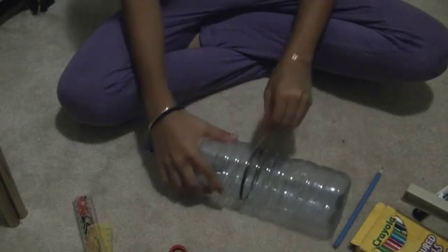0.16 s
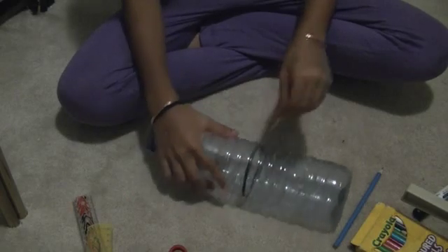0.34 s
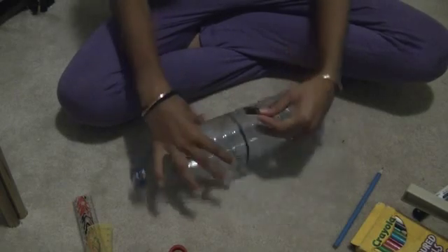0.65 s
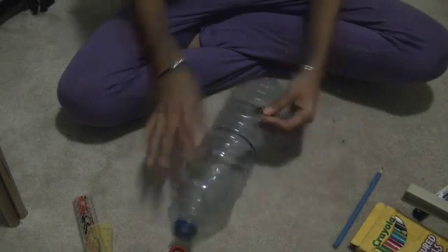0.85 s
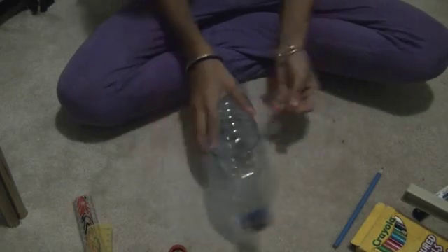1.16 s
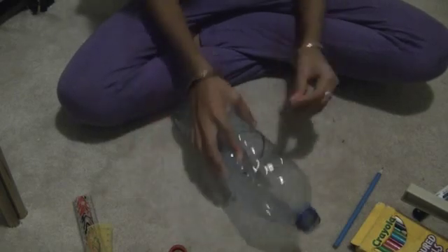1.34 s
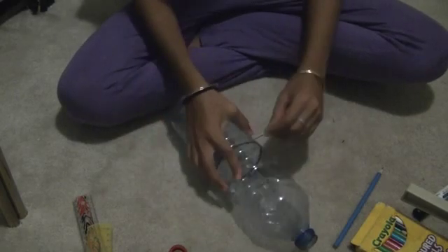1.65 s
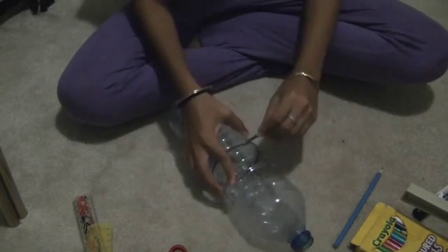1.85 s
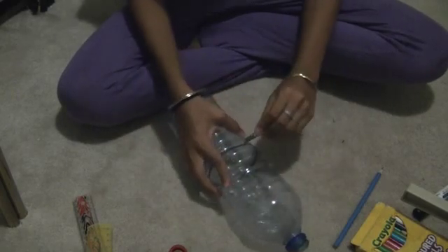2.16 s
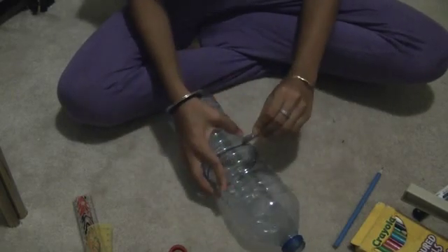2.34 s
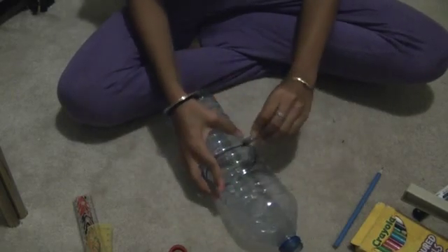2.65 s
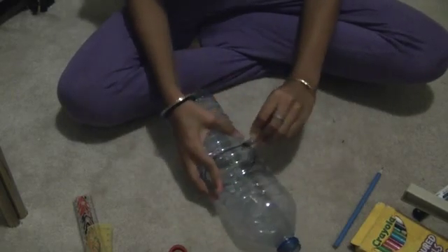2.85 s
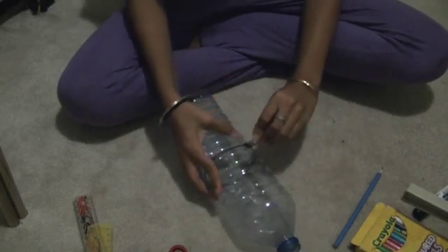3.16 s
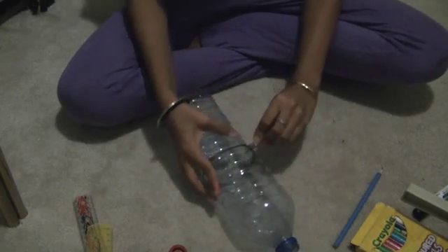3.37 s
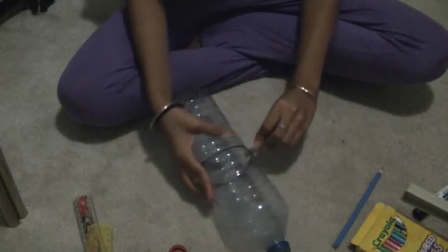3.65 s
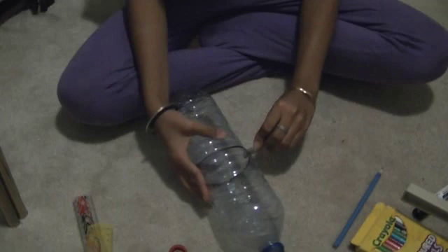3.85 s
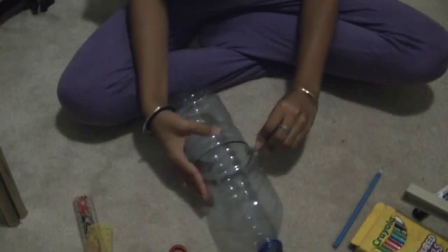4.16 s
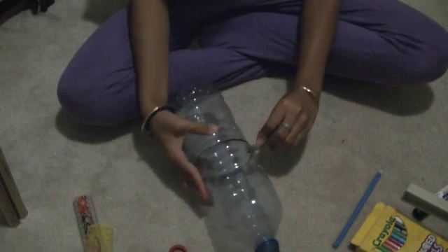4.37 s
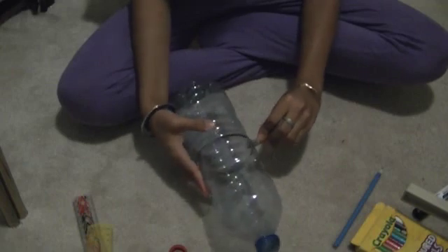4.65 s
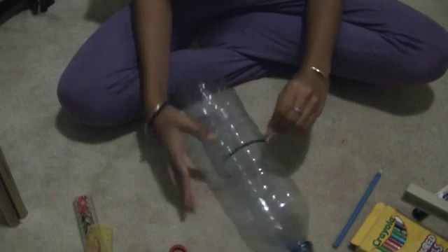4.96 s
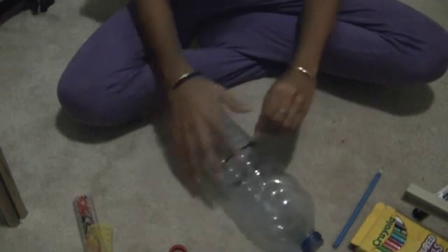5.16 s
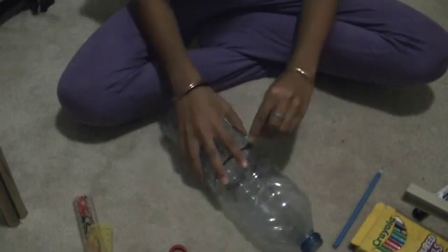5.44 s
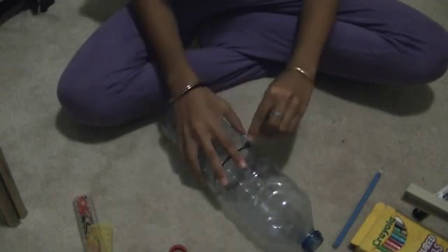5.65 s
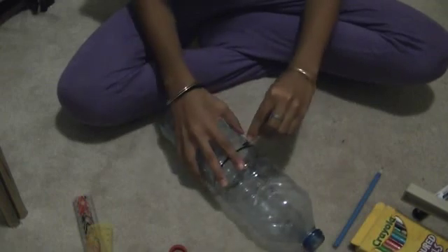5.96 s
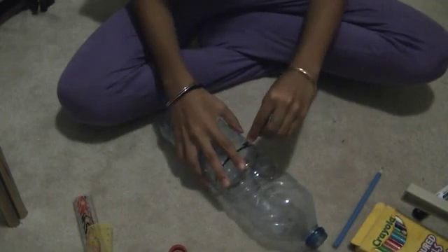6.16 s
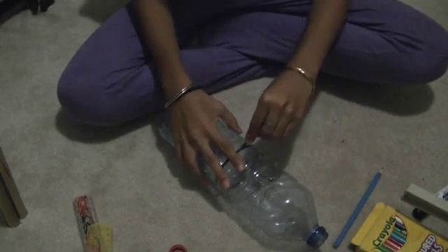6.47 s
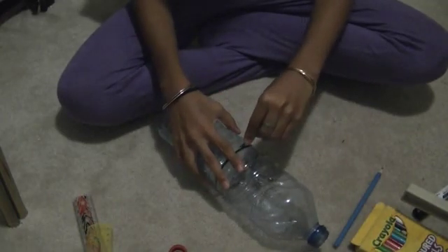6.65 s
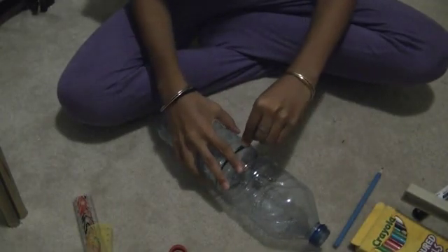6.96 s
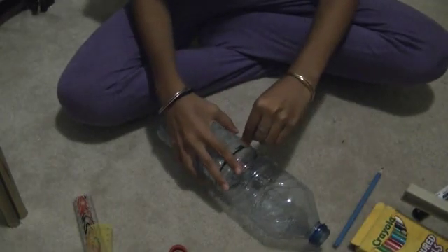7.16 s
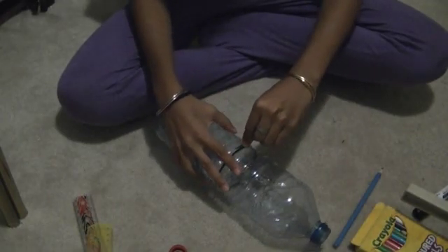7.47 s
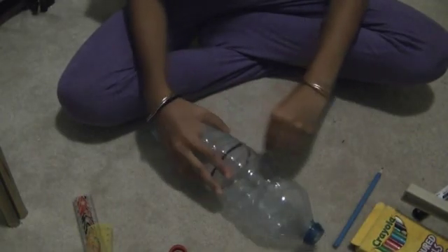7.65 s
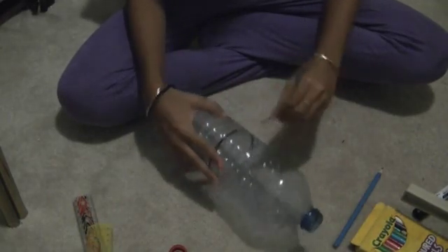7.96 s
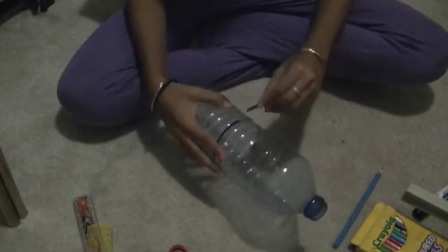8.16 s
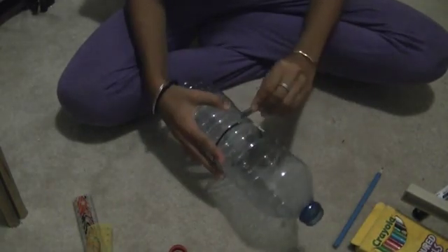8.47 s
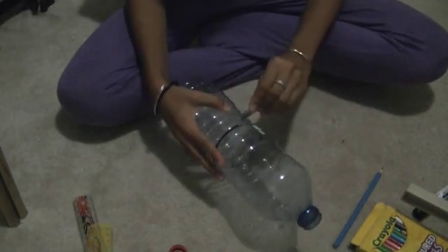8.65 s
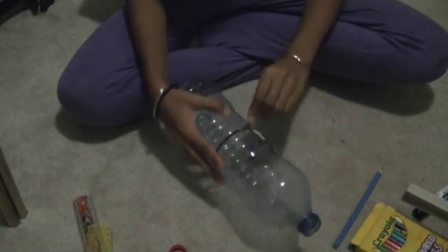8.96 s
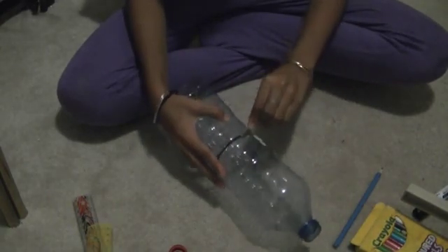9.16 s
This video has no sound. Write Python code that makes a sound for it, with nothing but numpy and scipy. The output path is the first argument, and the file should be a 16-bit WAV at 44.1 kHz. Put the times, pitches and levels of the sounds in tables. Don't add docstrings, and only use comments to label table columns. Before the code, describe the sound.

Thin plastic bottle crackles, creaks and snaps in sharp irregular pops as a blade saws and hands turn it, over steady hiss in a small room.

```python
import sys
import numpy as np
from scipy import signal
from scipy.fft import rfft, irfft, next_fast_len
from scipy.io import wavfile
from scipy.ndimage import uniform_filter1d, map_coordinates

SR = 44100
rng = np.random.default_rng(int(sys.argv[2]) if len(sys.argv) > 2 else 0)


def volts_from_decibels(level):
    exponent = np.asarray(level, float) / 20
    return 10 ** exponent


def transcribe(u):
    v = np.clip(np.atleast_2d(u).T, -1, 1)
    q = np.round(v * 32767).astype(np.int16)
    wavfile.write(sys.argv[1], SR, q)


N = 410571
FRAME_S = 1001 / 30000
PORTS = np.array([[1], [-1]])

# centre_hz, width_hz, level_db
FREE_AIR = [(203, 41, 3), (338, 40, 4), (437, 120, -3.5)]
# centre_hz, width_hz, level_db
PINNED_AIR = [(229, 32, -1), (318, 38, 2)]
# centre_hz, width_hz, level_db
CUT_AIR = [(181, 280, -14.5), (327, 26, 3.5), (240, 68, -12.5), (397, 57, -4), (514, 75, -9.5)]
AIR_STAGES = [FREE_AIR, PINNED_AIR, CUT_AIR]
# centre_hz, width_hz, level_db
WALL = [(588, 98, -2), (724, 48, 6.5), (890, 214, -2.5), (1097, 113, 3.5), (1350, 110, 0),
        (1650, 253, -1.5), (1950, 312, -4.5), (2520, 310, -5.5), (3630, 1100, -26)]


def unit(x):
    return x / np.sqrt(np.mean(x ** 2) + 1e-20)


def peak_one(x):
    return x / np.abs(x).max()


def along(points, hz):
    f, v = np.transpose(points)
    return np.interp(np.log(hz + 1), np.log(f + 1), v)


def filtered(x, response):
    m = next_fast_len(x.shape[-1] + 4096)
    spectrum = rfft(x, m) * response(np.fft.rfftfreq(m, 1 / SR))
    return irfft(spectrum, m)[..., :x.shape[-1]]


def wobble(rate):
    knots = rng.standard_normal(int(N * rate / SR) + 4)
    return map_coordinates(knots, [np.arange(N) * rate / SR])


def modes(table):
    def response(f):
        total = 0
        for k, (centre, width, db) in enumerate(table):
            total = total + (-1) ** k * volts_from_decibels(db) * 1j * f * width / (centre * centre - f * f + 1j * f * width)
        return total
    return response


def facet_modes(table):
    return lambda f: modes(table)(f) * np.square(1j * f / (1j * f + 170))


def air_at(s):
    pinned_s, vented_s = 2.2, 3.9
    return np.digitize(s, [pinned_s, vented_s])


def bright(hz, upper):
    # frequency_hz, density_db_per_hz
    edge_colour = [(1290, 10), (2200, 13), (2520, 13.5), (3110, 7.5), (4740, -4), (5240, -14), (10000, -22),
                   (15800, -35), (16500, -87.5)]
    split_hz = 6540
    share = 1 / (1 + (hz / split_hz) ** np.array(6))
    return volts_from_decibels(along(edge_colour, hz)) * (1 - share if upper else share)


def hiss():
    # frequency_hz, density_db_per_hz
    mid_colour = [(20, -15.5), (60, -5.5), (90, -8), (260, -2), (330, 1.5), (450, -4.5), (1000, -5),
                  (2400, -10.5), (4000, -13.5), (11300, -21.5), (15300, -32), (16500, -47.5)]
    # frequency_hz, density_db_per_hz
    side_colour = [(15, -82.5), (25, -21), (288, -5), (600, -8.5), (746, -11), (809, -9.5), (902, -10.5),
                   (1780, -17.5), (11300, -35), (14800, -41.5), (16500, -90.5)]
    mid = unit(filtered(rng.standard_normal(N), lambda hz: volts_from_decibels(along(mid_colour, hz))))
    side = unit(filtered(rng.standard_normal(N), lambda hz: volts_from_decibels(along(side_colour, hz))))
    mid = mid * volts_from_decibels(-62.0 + 0.23 * wobble(1.9))
    side = side * volts_from_decibels(-56.5 + 0.37 * wobble(3.05))
    return np.array([mid + side, mid - side])


def whine():
    # pitch_hz, rms_db
    circuit_tones = [(2640, -81), (2720.6, -65.5), (2800, -77), (5524, -83), (8241, -90)]
    t = np.arange(N) / SR
    since = (t - .047) % (3 * FRAME_S)
    slow = t % (15 * FRAME_S)
    surge_db = 7 * ((slow > .097) & (slow < .123)) - 14 * ((slow > .459) & (slow < .472))
    gate = uniform_filter1d((since < .0752) * volts_from_decibels(surge_db + 0.14 * wobble(25)), size=60)
    return gate * sum(np.sqrt(2) * volts_from_decibels(db) * np.sin(2 * np.pi * hz * since) for hz, db in circuit_tones)


def ticks():
    # start_in_frame_s, length_s, pitch_hz, peak_db, left_minus_right_db
    frame_blips = [(.0065, .011, 990, -57, 0), (.0215, .013, 965, -60.5, -2), (.02, .01, 3836, -66, -8)]
    busy_s, calm_db = 8.02, -4
    out, t = np.zeros((2, N)), np.arange(N) / SR
    for start, length, hz, db, pan_db in frame_blips:
        frame, since = np.divmod(t - start + FRAME_S, FRAME_S)
        sizes = volts_from_decibels(db + 3 * rng.standard_normal(int(frame[-1]) + 1))
        size_now = sizes[frame.astype(int)]
        if hz > 3000:
            size_now = np.where(t > busy_s, np.sqrt(size_now * volts_from_decibels(db)), size_now * volts_from_decibels(calm_db))
        blip = np.sin(np.pi * np.minimum(since / length, 1)) * np.sin(2 * np.pi * hz * since) * size_now
        out += blip * volts_from_decibels(pan_db / 2 * PORTS)
    held = uniform_filter1d(((t > 2.57) & (t < 2.64)) * 1.0, size=200)
    return out * (1 - held) + volts_from_decibels(-53) * held * np.sin(2 * np.pi * 950 * t)


def strokes():
    # strongest_s, length_s, level_db, boom_rel_db, edge_rel_db
    saw_strokes = [(0.369, 0.24, -43.5, 0.5, -5), (0.728, 0.32, -55.5, -1, -2.5),
                   (0.961, 0.094, -52.5, 4.5, -0.5), (1.481, 0.21, -59, -1, -1), (1.89, 0.064, -52, 1, -18),
                   (2.016, 0.044, -48, -15, -9.5), (2.163, 0.43, -66, -7, -1), (2.782, 0.25, -50, -8, -8.5),
                   (2.994, 0.24, -43, 0, -12), (3.214, 0.18, -41, -8, -9), (3.289, 0.098, -49.5, -12, -6.5),
                   (3.522, 0.21, -45, -2, -7), (3.79, 0.59, -48.5, -4, -8), (4, 0.13, -37.5, -3.5, -8.5),
                   (4.49, 0.19, -49, -10, -16.5), (4.696, 0.22, -49.5, 6, -4.5), (4.89, 0.13, -53, 5, -5.5),
                   (5.06, 0.14, -53.5, 2.5, -10), (5.232, 0.21, -42, -1, -12),
                   (6.397, 0.18, -51.5, -7, -14.5), (6.738, 0.12, -32.5, -4.5, -14.5),
                   (7.213, 0.13, -49, 2, -5), (8.734, 0.13, -50.5, 6, -14)]
    faint_strokes = [(0.64, 0.18, -62.5, 11, -18), (0.88, 0.22, -77, -11, 14.5), (4.37, 0.28, -59, 1, -16),
                     (5.68, 0.11, -64, 11, -9), (6.04, 0.11, -53.5, 4, -19), (7.91, 0.051, -78, 4, 17.5),
                     (8.06, 0.29, -78, 18, -19), (8.27, 0.17, -67.5, 10, -17), (8.99, 0.11, -62, 3, -21),
                     (9.13, 0.13, -70, 18, -3), (4.2, 0.13, -56.5, -9, -21), (3.42, 0.22, -61, -1, -5)]
    wall_shivers = [(0.0, 0.24, -34, -2.5, -10), (1.074, 0.13, -41.5, 6.5, -1.5),
                    (1.3, .13, -45, -1.5, -8.5), (5.42, 0.039, -53.5, 8, -21), (5.482, 0.072, -53, -5, -11),
                    (6.116, 0.061, -33, -7, -9), (5.766, 0.14, -46, 0, -3.5), (8.785, 0.12, -49, -10, -24),
                    (6.165, 0.079, -37, 0, -11.5), (6.686, 0.066, -33, -3, -9),
                    (7.444, 0.12, -33.5, 0, -17.5), (7.53, 0.0092, -30.5, 17, -23),
                    (7.561, 0.04, -21, -5, -11)]
    wall_swells = [
        (0.128, 0.038, -36, -0.5, -11.5),
        (0.6, 0.16, -58, -9, -4),
        (1.064, 0.12, -43.5, -10, -8.5),
        (5.33, 0.082, -65, 5.5, 0),
        (7.514, 0.079, -33, 3, -8.5),
        (7.552, 0.043, -38.5, 7, -25),
    ]
    rise_shares = (0.37, 0.029, 0.74)
    fade_db, roundness = 32.5, (1.86, 1.53, 2.7)
    sizzle_db = -0.5
    gain = np.zeros((4, N))
    kinds = (saw_strokes + faint_strokes, wall_shivers, wall_swells)
    for table, share, rounded in zip(kinds, rise_shares, roundness):
        for s, length, db, boom_db, edge_db in table:
            rise, fall = length * share, length * (1 - share)
            span = np.arange(max(round((s - 1.6 * rise) * SR), 0), round((s + 1.6 * fall) * SR))
            away = np.maximum((s - span / SR) / rise, (span / SR - s) / fall)
            parts = volts_from_decibels([[boom_db], [0], [edge_db], [edge_db + sizzle_db]])
            gain[:, span] += volts_from_decibels(db - fade_db * away ** rounded) * parts
    return uniform_filter1d(gain, size=300)


def grains(rate, spread_db, smooth):
    hits = (rng.random(N) < rate / SR) * rng.standard_normal(N)
    hits = hits * volts_from_decibels(spread_db * rng.exponential(size=N))
    return unit(hits) + smooth * rng.standard_normal(N)


def streaked(x, depth_db):
    z = signal.stft(x, nperseg=256)[2]
    depth_db = depth_db * np.linspace(.4, 1.8, z.shape[-2])[:, None]
    field = uniform_filter1d(rng.standard_normal(z.shape[-2:]), size=2, axis=0)
    field = uniform_filter1d(field, size=16, axis=1)
    return signal.istft(z * volts_from_decibels(depth_db * unit(field)), nperseg=256)[1][..., :N]


def rubbing():
    boom_gain, wall_gain, rasp_gain, sizzle_gain = strokes()
    slips, other = [grains(1500, spread_db=2.0, smooth=1.0) for port in range(2)]
    clumps = volts_from_decibels(1.9 * wobble(110))
    ports = streaked((slips + .5 * other * PORTS) * clumps, depth_db=2.5)
    slips = ports.mean(axis=0)
    stages = [unit(filtered(slips, modes(table))) for table in AIR_STAGES]
    air = np.choose(air_at(np.arange(N) / SR), stages)
    wall = unit(filtered(slips, modes(WALL)))
    dull = lambda hz: 1 / (1 + (hz / 13400) ** np.array(10))
    rasp = unit(filtered(ports, lambda hz: bright(hz, False) * dull(hz)))
    sizzle = unit(filtered(ports, lambda hz: bright(hz, True) * dull(hz)))
    body = air * boom_gain + wall * wall_gain
    edge = rasp * rasp_gain + sizzle * sizzle_gain
    return volts_from_decibels(-2.0) * body + volts_from_decibels(-0.5) * edge


def room(x):
    # frequency_hz, t60_s
    decay_times = [(200, 0.35), (1000, 0.24), (4000, 0.27), (12000, 0.23), (15500, 0.14)]
    hz, t, z = signal.stft(rng.standard_normal((2, SR // 2)), SR, nperseg=256)
    z[1] *= (1.55 * hz / (hz + 400))[:, None]
    z /= (1 + (hz / 13000) ** np.array(12))[:, None]
    decay = volts_from_decibels(-60 * t / along(decay_times, hz)[:, None])
    mid, side = signal.istft(z * decay, SR, nperseg=256)[1]
    tail = np.pad([mid + side, mid - side], ((0, 0), (180, 0))) / np.linalg.norm(mid + side)
    return signal.fftconvolve(x, tail, axes=1)[:, :N]


def catches():
    # start_s, peak_db, pitch_hz
    turn_slips = [
        (0.0298, -37, 3400),
        (0.3694, -38, 3650),
        (0.394, -36.5, 4530),
        (0.412, -37.5, 3080),
        (0.4244, -34, 3650),
        (0.5781, -45, 3700),
        (0.9624, -42, 3410),
        (1.0241, -36, 3700),
        (1.0465, -47, 3190),
        (1.3044, -36, 3270),
    ]
    blade_slips = [(2.7524, -41, 7280), (2.7994, -44, 4080), (2.974, -38, 3650), (3.009, -37, 3670),
                   (3.1877, -37.5, 3830), (3.2241, -36.5, 4300), (3.253, -32.5, 3640), (3.2914, -40, 3050),
                   (3.4734, -45.5, 7840), (3.5084, -46, 8500), (3.5693, -42.5, 8500), (3.741, -44, 3330),
                   (3.8924, -44, 7570), (3.9404, -44, 7160), (3.978, -44, 7400), (3.9853, -35, 7490)]
    grip_slips = [
        (4.6463, -57, 3530),
        (4.7714, -51, 3380),
        (4.89, -44, 3000),
        (5.0554, -53, 3030),
        (5.0918, -51, 3830),
        (5.1796, -50, 7000),
        (6.1964, -42, 4160),
        (7.4937, -29, 4130),
        (7.574, -23.5, 3440),
    ]
    dull_slips = [(2.974, -36, 1170), (3.001, -31, 1170), (3.211, -25, 1370), (3.225, -30, 1030),
                  (3.292, -34, 1740), (3.313, -34, 1370), (3.51, -40, 743), (3.53, -38, 1030),
                  (3.978, -36, 1960), (4.637, -44, 1130), (4.709, -26, 1140), (5.203, -26.5, 1100),
                  (5.42, -27, 1260), (5.775, -18, 1150), (6.196, -33.5, 1040), (6.714, -20, 1040),
                  (6.744, -19, 1370)]
    out, t = np.zeros((2, N + SR)), np.arange(SR // 40) / SR
    for s, db, hz in blade_slips + turn_slips + grip_slips + dull_slips:
        note = volts_from_decibels(-60 * t / .012) * np.sin(2 * np.pi * hz * t)
        crack = .3 * volts_from_decibels(-60 * t / 0.0033) * np.diff(rng.standard_normal((2, len(t) + 1)))
        at = round(s * SR)
        out[:, at:at + len(t)] += volts_from_decibels(db - 3) * (note + crack * (hz > 3000))
    return out[:, :N]


def notes():
    # start_s, peak_db, pitch_hz
    low_band = [(0.13, -18.5, 1134), (1.188, -10, 960), (2.327, -27, 1000), (2.3233, -30, 1300),
                (3.2, -27, 1350), (4.696, -25, 1115), (5.202, -35, 1090), (5.404, -21, 1280),
                (5.761, -12, 1200), (6.112, -22, 1170), (7.438, -25, 1350), (7.551, -21, 1350),
                (8.625, -11, 1050), (9.09, -39, 1030)]
    mid_band = [(0.1291, -12, 2020), (1.1867, -8, 2070), (2.3271, -42, 1900), (3.2001, -26.5, 1740),
                (4.0043, -32, 1950), (4.6957, -19.5, 2000), (5.4041, -34, 1460), (5.7603, -16, 2030),
                (6.112, -28, 2120), (7.438, -29, 1560), (7.5517, -20, 1660), (8.6258, -13, 1875),
                (9.0897, -51, 2720)]
    high_band = [(0.1278, -22, 4090), (1.188, -25, 4600), (2.3232, -33, 4200), (2.3271, -33, 3550),
                 (2.3275, -35, 4300), (5.3512, -30, 4910), (6.1125, -28, 3950), (6.1128, -31, 4600),
                 (6.677, -28, 4760), (7.5253, -29, 3100), (7.5253, -28, 4300), (8.6252, -13.5, 3600),
                 (8.6255, -24, 2550), (8.6255, -24, 4650), (8.9125, -37, 4400)]
    top_band = [
        (4.7157, -34, 7180),
        (4.8534, -41, 7700),
        (6.642, -33, 8200),
        (6.6765, -21, 7100),
        (6.6775, -20, 9500),
        (5.7605, -19, 7500),
        (8.626, -22, 7050),
    ]
    level_db, rise_s, hold_s, t60_s = -5, .0004, .0028, .01
    out, t = np.zeros(N + SR), np.arange(SR // 20) / SR
    shape = (1 - np.exp(-t / rise_s)) * volts_from_decibels(-60 * np.maximum(t - hold_s, 0) / t60_s)
    for s, db, hz in low_band + mid_band + high_band + top_band:
        out[round(s * SR):][:len(t)] += volts_from_decibels(db + level_db) * shape * np.sin(2 * np.pi * hz * t)
    return out[:N]


def facet_table(ring_hz):
    table = []
    for hz, width, level_db in WALL:
        loss_db = max(2 * np.log2(ring_hz / hz), 1.5 * np.log2(hz / ring_hz))
        table.append((hz, width, level_db - loss_db))
    return table + [(ring_hz, 0.08 * ring_hz, 3.5)]


def snaps():
    # start_s, peak_db, boom_rel_db, sharpness_rel_db, ring_hz
    loud_pops = [(0.129, -12, -15, -7, 1950), (0.393, -28.5, -12, -13, 566), (0.954, -34, -15, -24.5, 1810),
                 (1.1879, -8, -13, -12, 1140), (2.3272, -23, -17.5, -12.5, 1350),
                 (3.201, -26.5, -10.5, -19, 1310), (3.227, -38.5, -32, -30, 1020),
                 (4.005, -33.5, -4.5, -6, 1950), (4.696, -23, -34, -14.5, 1950),
                 (5.041, -32, -9.5, -43, 655), (5.199, -19.5, -12, -19, 1080), (5.352, -25, -17, 3.5, 650),
                 (5.405, -22.5, -11, -24, 1000), (5.761, -20.5, -15.5, 5, 1150),
                 (6.113, -19, -10, -15, 1250), (6.167, -34, -21, -1.5, 1120), (6.642, -29, -11.5, -21, 650),
                 (6.678, -23, -24, 7, 1120), (7.438, -21.5, -6.5, -14, 1350),
                 (7.5255, -20, -11.5, -0.5, 1340), (7.552, -14, -6, -16, 1290), (8.626, -10, -19, -8, 1860),
                 (8.913, -37.5, -13, 0, 960), (9.089, -36.5, -8, -35, 980)]
    # start_s, peak_db, boom_rel_db, sharpness_rel_db
    small_crackles = [(0.343, -40, -17, -3.5), (0.426, -35, -6, -7), (0.454, -40, 4, -15),
                      (0.492, -34, -9, -20), (0.712, -41.5, 0, -31), (0.757, -37.5, -5, -22),
                      (0.931, -46.5, 4, -5), (1.072, -36.5, -10, -17), (1.442, -43, -15, -20),
                      (1.538, -42.5, -11, -13), (1.88, -41, -21, -6.5), (2.001, -44, -8, -6),
                      (2.131, -39.5, -13, -11), (2.261, -44.5, -8, -6.5), (2.946, -38, -15, -13),
                      (3.256, -45, -26, -1), (4.11, -31, -22, -16.5), (4.717, -40, 5, -4),
                      (4.755, -33.5, -7, -11.5), (4.855, -40, -0.5, -2.5), (4.891, -37, -1, -30),
                      (5.01, -40, -12, -44), (5.3355, -33, -3, -31), (5.483, -41.5, 1.5, -33),
                      (6.059, -32, -12, -27), (8.253, -45, -6, -7.5), (8.545, -36, -10, -19),
                      (8.566, -35.5, -10, -38), (8.735, -33, -21, -11), (8.78, -35.5, -37, -23)]
    out, t = np.zeros((2, N + SR)), np.arange(SR // 7) / SR
    burst = lambda t60: volts_from_decibels(-60 * t / 0.017) + 0.74 * volts_from_decibels(-60 * t / t60)
    spread = rng.standard_normal(len(small_crackles))
    small = [row + (854 * np.exp(0.207 * z),) for row, z in zip(small_crackles, spread)]
    for s, db, boom_db, sizzle_db, ring_hz in loud_pops + small:
        rasp_db = -7.5 + 0.44 * sizzle_db
        noise = rng.standard_normal((4, len(t)))
        noise[:3, 8] += [9.5, 12, 2.5]
        boom = peak_one(filtered(noise[0] * volts_from_decibels(-60 * t / 0.031), facet_modes(AIR_STAGES[air_at(s)])))
        wall = peak_one(filtered(noise[1] * burst(0.16), facet_modes(facet_table(ring_hz))))
        ports = noise[2] + 0.44 * noise[3] * PORTS
        rasp = peak_one(filtered(ports, lambda hz: bright(hz, False)) * burst(0.015))
        sizzle = peak_one(filtered(ports, lambda hz: bright(hz, True)) * burst(0.015))
        crack = volts_from_decibels(rasp_db + 9.0) * rasp + volts_from_decibels(sizzle_db + 8.0) * sizzle
        crack = filtered(crack, lambda hz: np.square(1j * hz / (1j * hz + 250)))
        at = round(s * SR)
        out[:, at:at + len(t)] += volts_from_decibels(db) * (volts_from_decibels(boom_db + 4.5) * boom + volts_from_decibels(-2.5) * wall + crack)
    return out[:, :N]


def thuds():
    # start_s, peak_db
    slow_thumps = [
        (0.129, -47),
        (1.188, -66),
        (5.2, -59),
        (5.352, -57),
        (5.761, -52),
        (6.678, -55),
        (7.552, -52),
        (8.626, -56),
    ]
    out, push = np.zeros(N), np.hanning(round(.012 * SR))
    for s, db in slow_thumps:
        out[round(s * SR):][:len(push)] += volts_from_decibels(db) * push
    return filtered(out, lambda hz: 1j * hz / (1j * hz + 20))


def rings():
    # start_s, length_s, pitch_hz, peak_db
    patches = [(2.334, .022, 1340, -36), (2.355, .016, 1000, -43), (2.386, .014, 1300, -49),
               (2.333, .02, 1950, -46), (5.354, .032, 1400, -42), (5.384, .02, 750, -42),
               (5.358, .02, 3350, -50), (5.411, .02, 1350, -34), (5.43, .012, 900, -42),
               (5.455, .025, 1400, -52), (6.12, .016, 1150, -30), (6.138, .018, 1100, -36),
               (6.119, .008, 2100, -34), (6.196, .009, 450, -35), (8.634, .014, 1050, -30),
               (8.652, .014, 1050, -34), (8.662, .024, 370, -38), (8.664, .014, 1950, -41),
               (8.74, .026, 340, -41), (8.718, .007, 4700, -48), (8.785, .02, 1700, -49),
               (5.782, .016, 1150, -31), (7.551, .016, 335, -13), (7.526, .014, 335, -19),
               (7.585, .024, 335, -25), (7.442, .01, 335, -24), (7.566, .013, 335, -22),
               (7.572, .008, 1250, -24), (0.134, .01, 650, -24)]
    out, drift = np.zeros(N), .7 * wobble(250)
    for s, length, hz, db in patches:
        t, at = np.arange(round(length * SR)) / SR, round(s * SR)
        phase = drift[at:][:len(t)] * min(hz / 1300, 1) ** 2
        swell = np.sin(np.pi * (t / length) ** .7)
        out[at:][:len(t)] += volts_from_decibels(db) * swell * np.sin(2 * np.pi * hz * t + phase)
    return out


def squeaks():
    # start_s, length_s, pitch_hz, level_db
    rough_notes = [(1.075, .07, 690, -36), (1.125, .03, 1740, -42), (1.08, .06, 3400, -56), (1.3, .07, 1850, -51),
                   (1.32, .05, 3350, -59), (5.25, .08, 3400, -52), (2.63, .16, 90, -52), (0.495, .04, 150, -47),
                   (0.925, .04, 150, -45), (8.29, .09, 13000, -70), (5.25, .09, 14438, -68),
                   (5.24, .09, 11090, -66), (5.095, .05, 15547, -72), (5.36, .045, 720, -40),
                   (5.408, .025, 900, -44), (1.08, .06, 14890, -60), (1.25, .13, 14820, -66),
                   (1.29, .08, 11127, -63), (1.255, .04, 9017, -60), (6.92, .09, 320, -55), (1.08, .06, 950, -42),
                   (5.336, .016, 360, -36), (1.09, .06, 7574, -62), (1.08, .07, 9135, -57),
                   (1.08, .07, 9889, -66), (1.34, .04, 5600, -63), (5.2, .12, 6708, -64), (5.26, .06, 8581, -60),
                   (5.26, .05, 9400, -62), (1.08, .05, 4500, -56), (1.08, .06, 14190, -64),
                   (1.08, .05, 8000, -58)]
    out = np.zeros(N)
    for s, length, hz, db in rough_notes:
        t = np.arange(round(length * SR)) / SR
        width_hz = 25 + .02 * hz if hz < 3000 else 70
        note = unit(filtered(rng.standard_normal(len(t)), modes([(hz, width_hz, 0)])))
        out[round(s * SR):][:len(t)] += volts_from_decibels(db - 2) * np.sin(np.pi * t / length) ** 0.31 * note
    return out


def bangles():
    # pitch_hz, level_db
    metal_modes = [(3424, -9), (4441, -8), (5168, -8), (6573, -4), (7149, -11), (7960, -7), (8590, -9),
                   (9040, -2), (10896, -4), (11763, -4), (14300, -13), (14890, -8), (15531, -8),
                   (15714, -10)]
    # start_s, length_s, level_db
    wrist_jerks = [
        (1.07, .07, -49),
        (1.25, .12, -61),
        (5.095, .03, -66),
        (5.21, .12, -59),
    ]
    width_hz, clinks_per_s = 30, 300
    t, shake = np.arange(N) / SR, np.zeros(N)
    for s, length, db in wrist_jerks:
        shake += volts_from_decibels(db) * np.abs(np.sin(np.pi * np.clip((t - s) / length, 0, 1)))
    out = np.zeros((2, N))
    for hz, db in metal_modes:
        clinks = unit((rng.random(N) < clinks_per_s / SR) * rng.standard_normal(N))
        ring = filtered(clinks * shake, modes([(hz, width_hz, db)])) * np.sqrt(SR / width_hz / np.pi)
        out += ring * volts_from_decibels(rng.normal(0, 2) * PORTS)
    return out


def dipped(x):
    gap_times = [
        1.178,
        2.315,
        5.752,
        6.101,
        6.635,
        8.608,
    ]
    length_s, corner_hz = .007, 3000
    t = np.arange(N) / SR
    gap = uniform_filter1d(sum(np.abs(t - s) < length_s / 2 for s in gap_times) * 1.0, size=80)
    return x - gap * filtered(x, lambda hz: 1 - 1 / (1 + (hz / corner_hz) ** np.array(6)))


def scene():
    # start_s, end_s
    quiet_span = (4.13, 5.09)
    bottle = snaps() + catches()
    ring = notes()
    rub = rubbing() + squeaks()
    direct = (bottle + ring + rub) * volts_from_decibels(.4 * PORTS)
    heard = direct + room(volts_from_decibels(-6.5) * bottle + volts_from_decibels(-8.0) * rub + volts_from_decibels(-22) * ring)
    low_cut = lambda hz: (1j * hz / (1j * hz + 130)) ** np.array(3) * (hz < 16300)
    idle = (np.arange(N) > quiet_span[0] * SR) & (np.arange(N) < quiet_span[1] * SR)
    camera = hiss() + whine() * volts_from_decibels(-9.5 * idle) + ticks() * volts_from_decibels(-4.5 * idle) + thuds()
    return filtered(heard, low_cut) + camera + rings() + bangles()


def top_cut(x):
    return signal.sosfilt(signal.butter(12, 16850, fs=SR, output="sos"), x)


def record(dry):
    mix = dipped(dry)
    return top_cut(mix)


dry = scene()
out = record(dry)
transcribe(out)
```